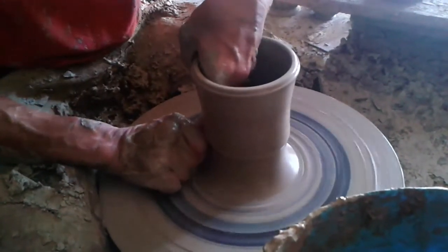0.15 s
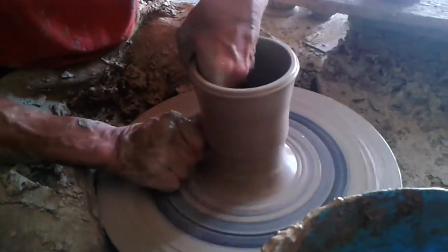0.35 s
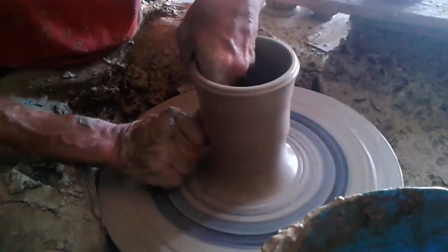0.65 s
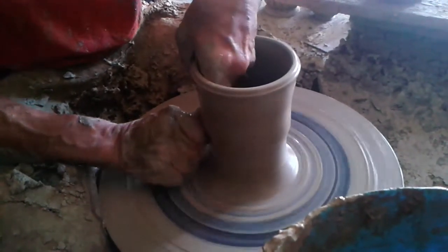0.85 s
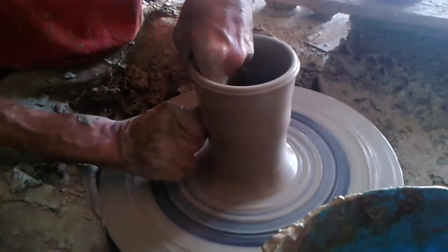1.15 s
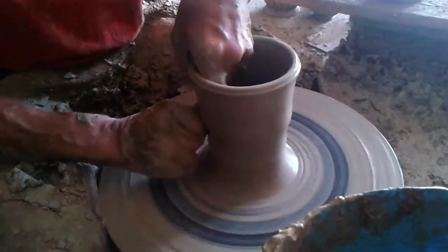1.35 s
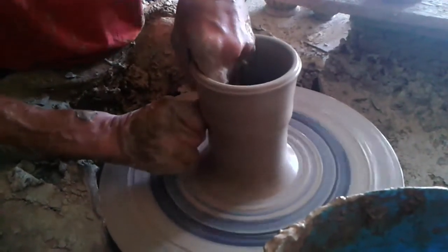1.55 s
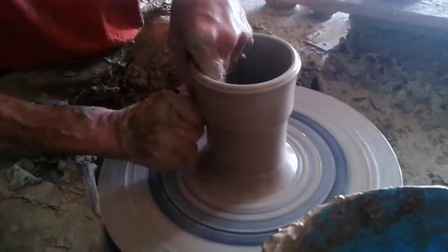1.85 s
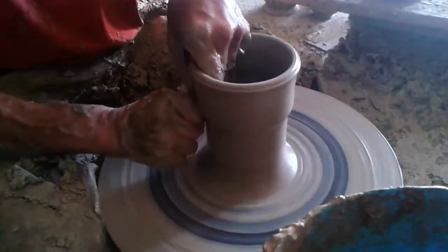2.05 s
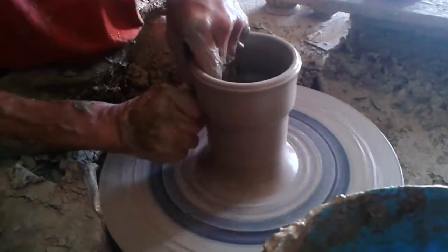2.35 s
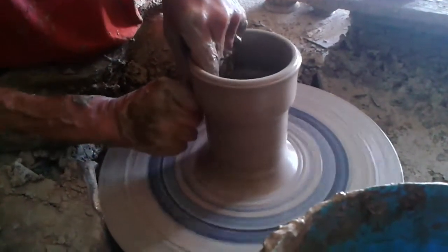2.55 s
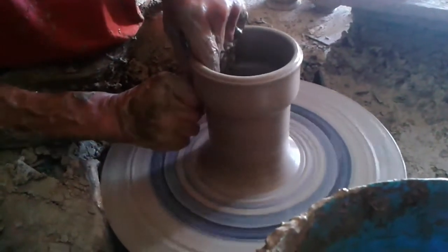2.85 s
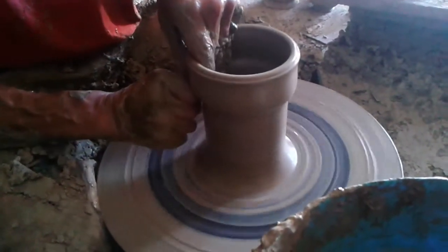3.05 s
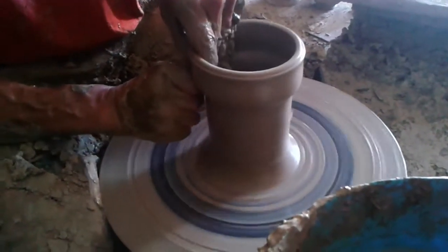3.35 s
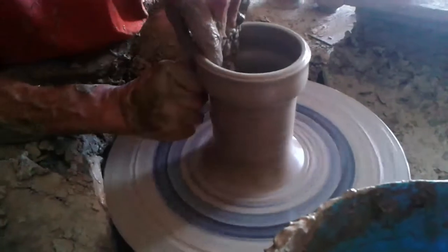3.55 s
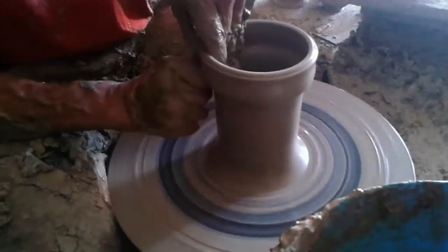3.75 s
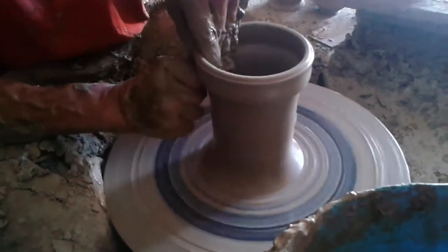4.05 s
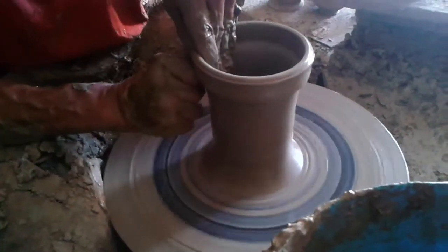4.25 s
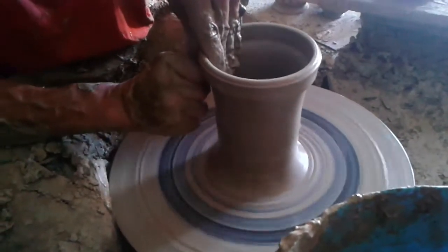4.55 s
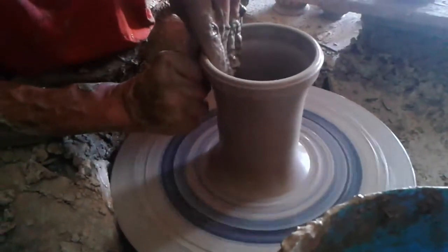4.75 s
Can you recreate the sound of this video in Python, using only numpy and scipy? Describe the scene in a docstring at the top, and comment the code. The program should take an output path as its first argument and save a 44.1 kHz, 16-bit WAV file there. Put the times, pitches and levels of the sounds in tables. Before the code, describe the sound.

Unbroken machine drone in a workshop, heard in mono from near the wheel. Low boomy rumble wavers gently, several steady motor tones hum within it, and a nasal whine stays on top, throbbing faintly as the wheel turns. Upper detail is dull and flickers in small patches, with almost no high treble. No bangs, pauses or splashes.

```python
"""A broad, patchy rumble with a steady motor whine: a potter's wheel in a workshop, clay drawn up by hand.
The rumble is coloured noise: belt and bearings shaking the frame. Rotor, mains and rotor slots
of the induction motor sing clean lines through it, as sines with wavering level and phase.
Rotor lines and slot whine sag a little in pitch while the hands load the wheel."""
import sys
import numpy as np
from scipy import signal
from scipy.fft import rfft, irfft
from scipy.io import wavfile

SR = 44100
rng = np.random.default_rng(int(sys.argv[2]) if len(sys.argv) > 2 else 0)


def transcribe(signal):
    """Save signal, clipped to [-1, 1], as a 16-bit WAV file at the path in sys.argv[1]."""
    frames = np.atleast_2d(signal).T
    limited = np.clip(frames, -1, 1)
    pcm = np.round(limited * 32767).astype(np.int16)
    wavfile.write(sys.argv[1], SR, pcm)


def convert_level_to_amplitude(level_db):
    """Map a level in decibels to its linear amplitude factor."""
    exponent = np.asarray(level_db, float) / 20
    return 10 ** exponent


N = 216290
TIME = np.arange(N) / SR


def drift(rate_hz):
    """Slow chance of spread 1, changing about rate_hz times a second: noise through two equal poles."""
    step = 40   # samples between the points that are drawn
    pole = np.exp(-2 * np.pi * rate_hz * step / SR)
    noise = rng.standard_normal(N // step + 2002)
    slow = signal.lfilter([1], [1, -2 * pole, pole * pole], noise)[2000:]   # skip the filter's start
    return np.interp(np.arange(N) / step, np.arange(len(slow)), slow / slow.std())


# broad colour of the rumble, before its peaks and dips: f/Hz, level/dB per Hz
RUMBLE_COLOUR = [(25, -90), (50, -89.5), (60, -69.5), (105, -66.5), (160, -53.5), (210, -49.5), (450, -54),
                 (560, -57.5), (820, -66), (1500, -74), (2500, -86.5), (3700, -89), (5200, -99),
                 (5600, -106), (5800, -135), (6800, -135), (7000, -103), (8500, -96), (16000, -99)]
# peaks and dips of the rumble, from frame and room: f/Hz, width/Hz, lift/dB
RUMBLE_PEAKS_AND_DIPS = [(64.5, 12, 3.5), (76, 6, -3), (89, 6, -10), (107, 6, -6.5), (132, 13, 3),
                         (140.7, 5, -5.5), (154, 4.4, -4.5), (165.3, 4.7, -5), (361, 17, -3.5),
                         (176, 11, 3), (229.6, 10, -2), (286, 9.7, 3.5), (344, 8.9, 2), (420.6, 21, 2.5),
                         (439, 8, -3), (484, 20, -3.5), (219.2, 37.5, 6.5), (252, 40.3, 6.5),
                         (332.2, 25, 6), (399.3, 45, 7), (454.7, 52, 4.5), (470.3, 18, -2.5),
                         (547.6, 15, -5), (543, 5.6, -6.5), (622, 6, -7.5), (649, 7.1, -4), (513.7, 17, 4),
                         (536, 10, 3), (584, 11, 4), (607.4, 8.6, 9), (676, 8.6, -0.5), (708, 9.7, 2),
                         (773, 10, -4), (857, 19, -7), (866, 12, 4), (906, 48, 4), (924, 7.2, -5.5),
                         (952, 9.1, 3), (945, 37, 7), (998, 30, 3.5), (1106, 10, -6), (1132, 9.7, 6.5),
                         (1142, 7, -5), (1149, 59, 4.5), (1235, 56, 3.5), (1250, 9.1, -3.5), (1279, 21, 3),
                         (1324, 11, -5), (1365, 14, 4.5), (1378, 10, 3.5), (1337, 45, 3.5), (1503, 25, 4),
                         (1820, 170, 3.5), (1600, 40, -3), (2190, 89, 4.5), (2750, 350, -2),
                         (3570, 80, -2.5), (3980, 320, -3.5), (3650, 100, 2.5)]
# gain of the low drone around 170 Hz: t/s, level/dB
DRONE_GAIN = [(0, -5), (1.4, -0.5), (2.3, -2.5), (3.7, 1.5), (4.9, -1.5)]
# gain of the boom around 215 Hz: t/s, level/dB
UPPER_BOOM_GAIN = [(0, 3), (0.75, -2.5), (1.3, 3.5), (1.95, -4.5), (2.7, -3.5), (3.2, 1.5), (3.75, 3.5),
                   (4.3, 3.5), (4.9, -2)]


def rumble(low_spread_db, high_spread_db):
    """Random shaking from belt and bearings, coloured by frame and room; low and high parts waver apart."""
    hz = np.maximum(np.arange(N // 2 + 1) * SR / N, 1)
    colour_hz, colour_db = np.transpose(RUMBLE_COLOUR)
    level_db = np.interp(np.log(hz), np.log(colour_hz), colour_db)
    for centre_hz, width_hz, lift_db in RUMBLE_PEAKS_AND_DIPS:
        level_db = level_db + lift_db / (1 + (2 * (hz - centre_hz) / width_hz) ** 4)
    # sqrt(SR / 2) brings white noise to 0 dB per Hz
    shaken = rfft(rng.standard_normal(N)) * np.sqrt(SR / 2) * convert_level_to_amplitude(level_db)

    # each share passes what lies below its corner; differences between them cut out the bands
    below_110 = 1 / (1 + (hz / 110) ** 4)
    below_192 = 1 / (1 + (hz / 192) ** 8)
    below_230 = 1 / (1 + (hz / 230) ** 24)
    below_500 = 1 / (1 + (hz / 500) ** 4)
    floor_boom = irfft(shaken * below_110, N)
    drone = irfft(shaken * (below_192 - below_110), N)
    upper_boom = irfft(shaken * (below_230 - below_192), N)
    low = irfft(shaken * (below_500 - below_230), N)
    high = irfft(shaken * (1 - below_500), N)

    low = low + convert_level_to_amplitude(np.interp(TIME, *np.transpose(DRONE_GAIN))) * drone
    low = low + convert_level_to_amplitude(np.interp(TIME, *np.transpose(UPPER_BOOM_GAIN))) * upper_boom
    floor_boom = convert_level_to_amplitude(0.85 * TIME) * floor_boom   # boom through the floor grows 0.85 dB per second
    return floor_boom + convert_level_to_amplitude(low_spread_db * drift(10.0)) * low + convert_level_to_amplitude(high_spread_db * drift(4.5)) * high


def hand_load():
    """Load of the hands on the wheel, 0-1: they lean on the clay, hold, and ease off."""
    press_start_s, press_s, ease_start_s, ease_s = 0.8, 1.3, 3.7, 0.8
    press = np.clip((TIME - press_start_s) / press_s, 0, 1)
    ease = np.clip((TIME - ease_start_s) / ease_s, 0, 1)
    return press - ease


def tone(hz, level_db, waver_db, wobble_rad):
    """A sine from a random start, its level (dB rms) wavering and its phase wobbling."""
    turns = np.cumsum(hz + 0 * TIME) / SR + rng.random()
    phase = 2 * np.pi * turns + wobble_rad * drift(3)
    return np.sqrt(2) * convert_level_to_amplitude(level_db + waver_db * drift(3.0)) * np.sin(phase)


# lines locked to the rotor, before waver and throb: multiple of the turning rate, level/dB rms
ROTOR_LINES = [(1, -69.5), (4, -58), (6, -43.5), (11, -39.5), (21, -50), (22, -45.5), (25, -36.5),
               (27, -46), (28, -52.5), (32, -59.5), (35, -55), (44, -61), (45, -57), (47, -55), (94, -66.5)]


def rotor():
    """Small unbalances repeat on every turn; the wheel's heavy side loads the belt and makes them throb."""
    free_hz, sag_hz = 24.565, 0.045   # turning rate when free, its sag under full load
    wheel_hz, wheel_peak_s = 1.5, 2.41
    throb = 1 + 0.2 * np.cos(2 * np.pi * wheel_hz * (TIME - wheel_peak_s))
    turning_hz = free_hz - sag_hz * hand_load()
    lines = sum(tone(k * turning_hz, db, waver_db=2.0, wobble_rad=0.52) for k, db in ROTOR_LINES)
    return throb * lines


MAINS_HZ = 49.96
# magnetic hum, before waver: multiple of the mains, level/dB rms
MAINS_LINES = [(6, -32.5), (7, -36), (10, -56), (12, -53)]


def magnetic_hum():
    """The iron pulls at multiples of the mains."""
    return sum(tone(k * MAINS_HZ, db, waver_db=1.5, wobble_rad=0.53) for k, db in MAINS_LINES)


# the whine and its upper sidebands, before waver: steps of twice the mains, level/dB rms
WHINE_LINES = [(0, -34), (1, -49.5), (2, -63.5)]


def slot_whine():
    """Rotor slots pass the stator teeth; the field pulsing at twice the mains adds sidebands."""
    free_hz, sag_hz = 637.8, 2.0   # pitch when running free, its sag under full load
    hz = free_hz - sag_hz * hand_load()
    return sum(tone(hz + 2 * k * MAINS_HZ, db, waver_db=0.8, wobble_rad=0.2) for k, db in WHINE_LINES)


def scene():
    """Motor lines over the rumble of the wheel."""
    motor = rotor() + magnetic_hum() + slot_whine()
    return (rumble(low_spread_db=0.5, high_spread_db=0.5) + motor)[None]


# blocks in which most of the treble is kept: t/s
FULLER_BLOCKS = [.101, .242, .307, .471, .822, 1.473, 1.542, 2.278, 2.348, 2.583, 2.746, 2.933, 3.235,
                 4.065, 4.672]


def thin_treble(x, together, linger):
    """Keeps or drops patches of treble block by block, partly in step, the higher the rarer kept."""
    block, lead = 1024, 734   # samples: block step, silence ahead that sets where blocks fall
    most_share, half_hz, steepness, top_hz = 0.8, 3800, 11, 5800
    window = np.sin(np.pi * (np.arange(2 * block) + 0.5) / (2 * block))
    hz, _, cells = signal.stft(np.pad(x, (lead, 0)), SR, window, 2 * block, block)
    blocks = cells.shape[1]
    edges = np.r_[np.geomspace(2580, 6890, 11), 6890 + 689 * np.arange(1, 15)]   # lower patch edges, Hz

    chance = together * rng.standard_normal(blocks) + rng.standard_normal((len(edges), blocks))
    chance = signal.lfilter([1], [1, -linger], chance)   # a patch tends to stay as it was
    rank = chance.argsort().argsort() / blocks
    # share of the blocks in which each patch is kept; it halves at half_hz
    share = most_share / (1 + (edges / half_hz) ** steepness) * (edges < top_hz)
    kept = rank < share[:, None]

    # fuller blocks keep every patch below 5 kHz, and each one above with a chance of 0.6
    fuller = np.round((np.array(FULLER_BLOCKS) * SR + lead) / block).astype(int)
    lucky = rng.random((len(edges), len(fuller))) < 0.6
    kept[:, fuller] = lucky | (edges[:, None] < 5000)

    patch = np.searchsorted(edges, hz) - 1   # -1 lies below the patches and is always kept
    cells = cells * np.where(patch[:, None] < 0, 1, kept[patch])
    return signal.istft(cells, SR, window, 2 * block, block)[1][lead:lead + N]


def roll_off(x):
    """The treble ends steeply here."""
    return signal.sosfilt(signal.butter(12, 15760, fs=SR, output="sos"), x)


def record(dry):
    soft_end = np.minimum((N - np.arange(N)) / 60, 1)
    hiss = convert_level_to_amplitude(-96) * rng.standard_normal(N)
    mix = thin_treble(dry[0], together=0.8, linger=0.3) * soft_end + hiss
    return roll_off(mix[None])


dry = scene()
out = record(dry)
transcribe(out)
```